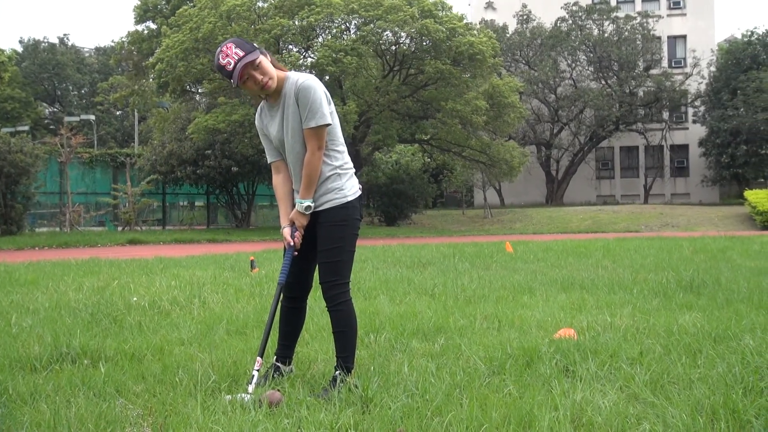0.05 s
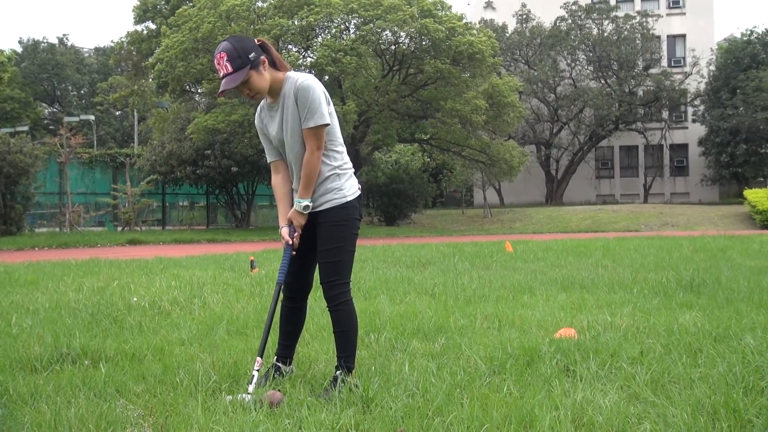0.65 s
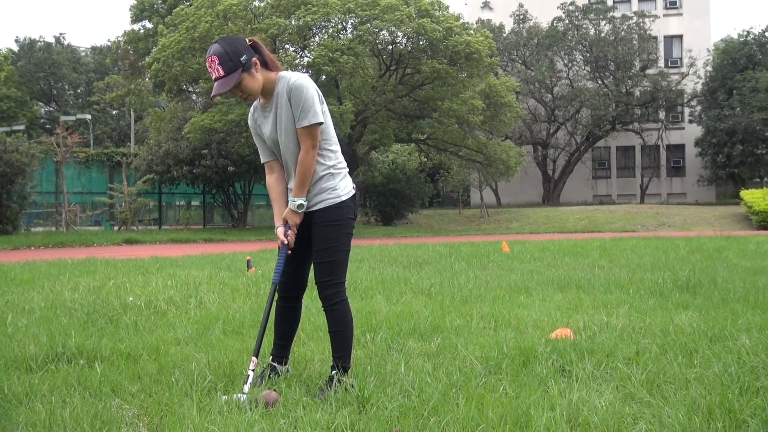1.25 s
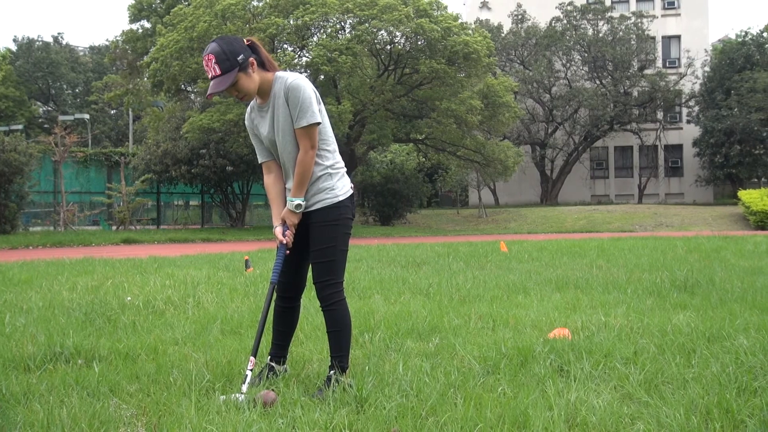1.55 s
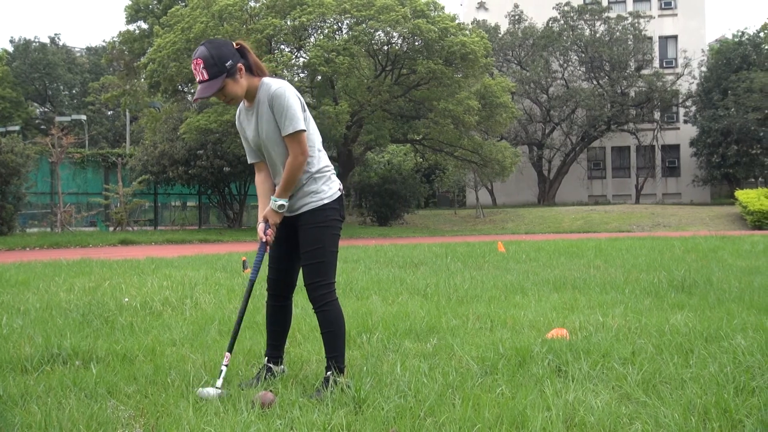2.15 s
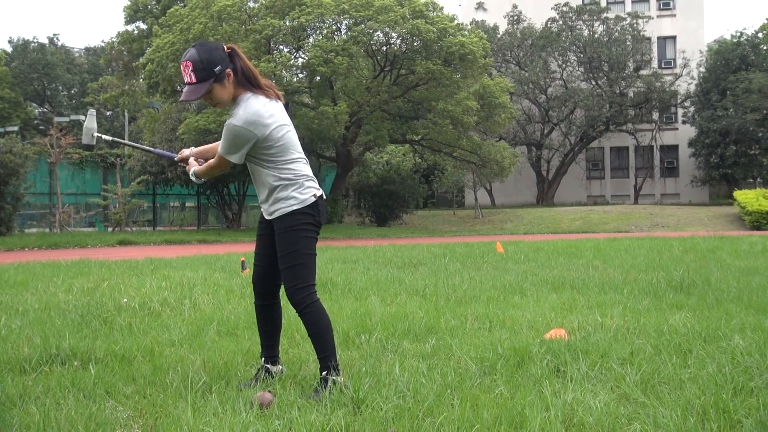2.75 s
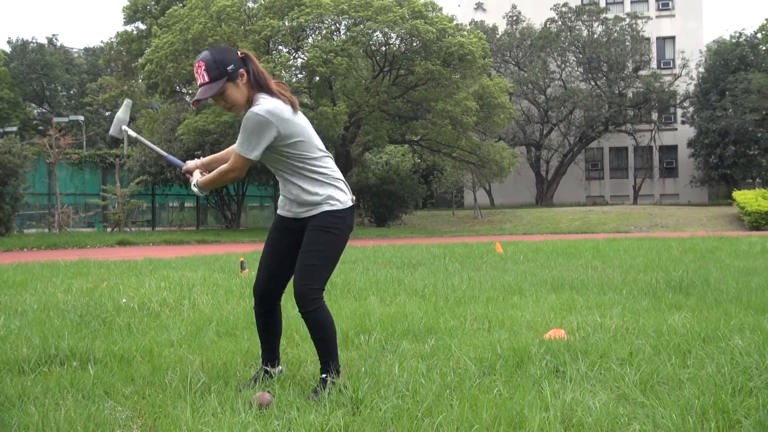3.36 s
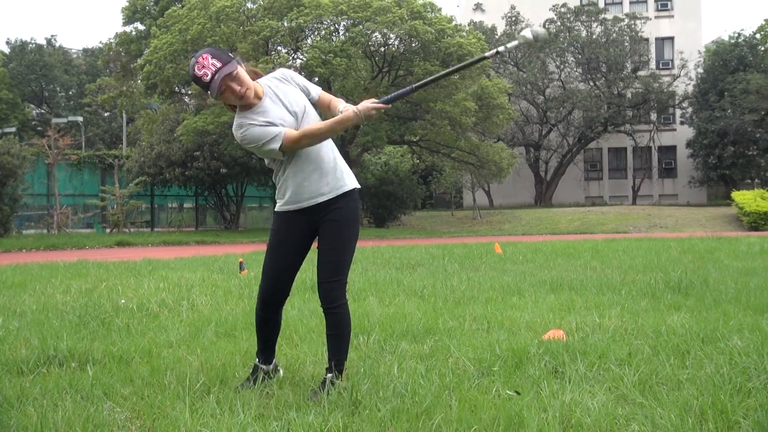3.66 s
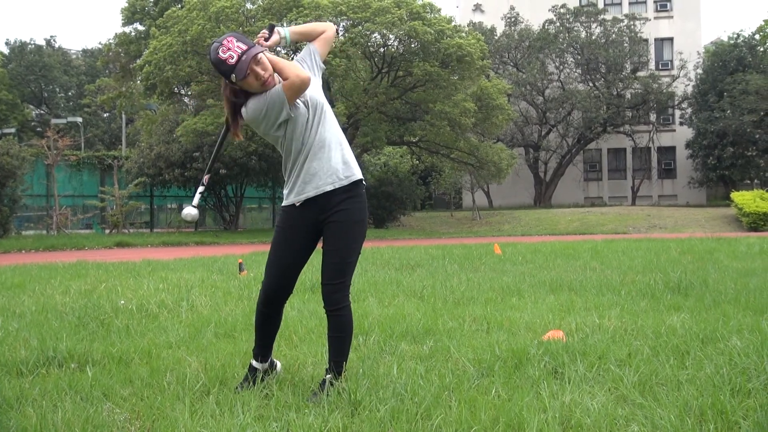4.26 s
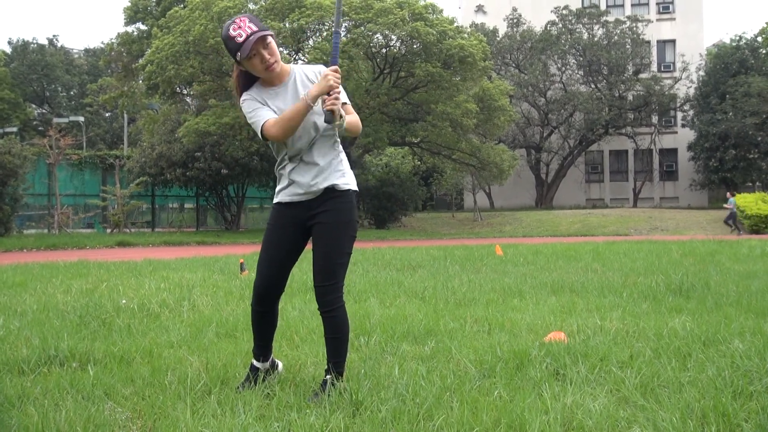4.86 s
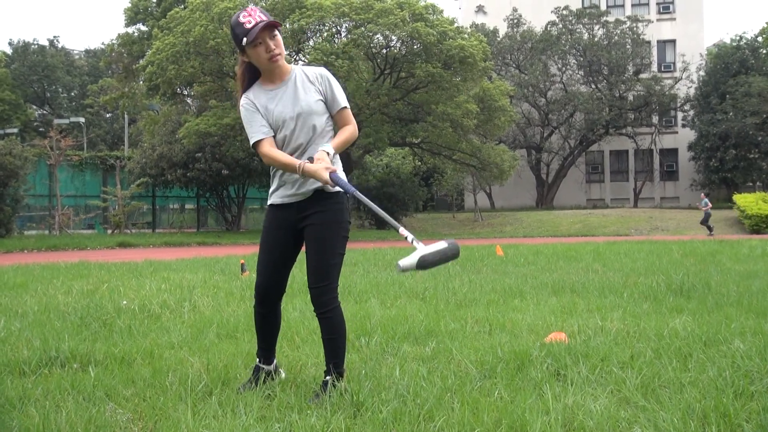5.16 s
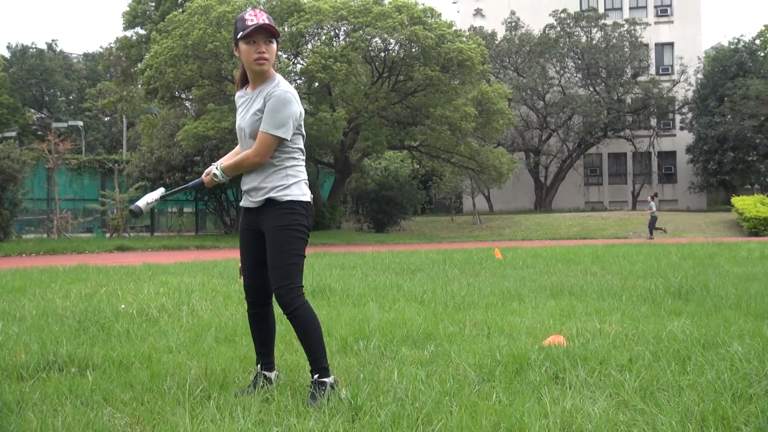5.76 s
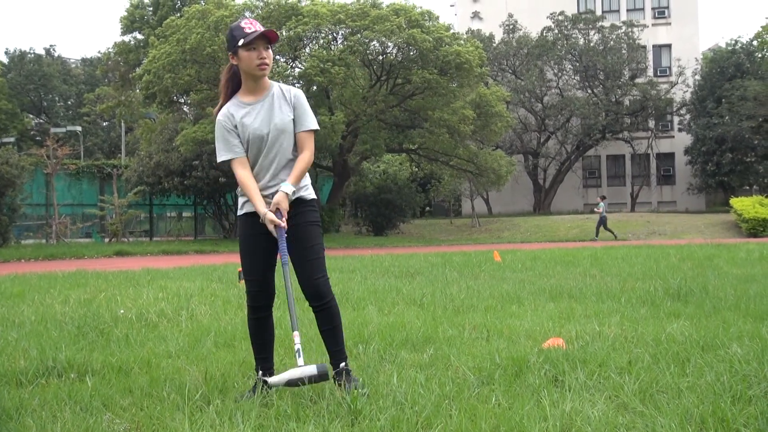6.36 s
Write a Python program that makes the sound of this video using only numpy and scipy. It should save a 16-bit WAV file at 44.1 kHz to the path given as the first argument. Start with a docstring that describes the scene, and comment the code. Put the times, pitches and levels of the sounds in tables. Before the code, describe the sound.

One sharp wooden crack of mallet on ball with a brief grass swish, against a quiet outdoor rumble and faint bird chirps.

```python
"""A mallet cracks against a wooden ball: the sudden push sends out a pulse and the wood rings briefly.
The ground thumps, and the swing tears through the lawn; ball and mallet also brush the grass lightly.
A small bird gives a high, buzzy trill of quick falling notes; far birds chirp and crickets sing faintly.
Underneath, a light breeze rumbles and distant traffic hums."""
import sys
import numpy as np
from scipy.fft import rfft, irfft, next_fast_len
from scipy.io import wavfile
from scipy.ndimage import map_coordinates

SR = 44100
rng = np.random.default_rng(int(sys.argv[2]) if len(sys.argv) > 2 else 0)


def dump(signal):
    """Clip the signal to [-1, 1] and save it as 16-bit WAV at the path in sys.argv[1]."""
    limited = np.clip(np.atleast_2d(signal).T, -1, 1)
    pcm = np.round(limited * 32767).astype(np.int16)
    wavfile.write(sys.argv[1], SR, pcm)


N = 282681

HIT_S = 3.5271  # when the mallet meets the ball
# the bright tone of cracking wood and stalks: (frequency [Hz], relative level [dB])
CRACK_TONE = [(800, -27), (2500, -0.5), (5000, -1.5), (7000, -6), (9500, 1), (15000, -4.5), (16000, -5)]


def strike(push_db=-10, push_hz=660, tick_db=-19, tick_s=.00037, scatter_db=-30, scatter_t60=.015):
    """The sudden push on the ball sends out one swing of air pressure; the wood cracks and rings."""
    # the tone of the noise that widens the crack: (frequency [Hz], relative level [dB])
    width_tone = [(120, -25), (350, 8), (1100, 2), (1500, -6), (2400, -6), (4100, 4), (4800, -28)]
    t = clock() - HIT_S
    cycles = (t - .00119) * push_hz  # counted from the middle of the contact
    push = -np.cos(2 * np.pi * cycles) * np.exp(-(cycles / .6) ** 2)
    # the first touch is a hard tick
    touch = (t >= 0) * np.exp(-(t / tick_s) ** 2)
    tick = noise(CRACK_TONE) * touch
    tick *= np.linalg.norm(touch) / np.linalg.norm(tick)
    # a brief noise, opposite in the two ears, widens the crack
    width = amp(-2) * noise(width_tone) * np.array([[1], [-1]])
    scatter = (noise(CRACK_TONE) + width) * dying(HIT_S, scatter_t60)
    return amp(push_db) * push + wood_ring() + amp(tick_db) * tick + amp(scatter_db) * scatter


def wood_ring(build_s=.002):
    """Mallet and ball ring with many short tones, which build up while the two still touch."""
    # the tones of the wood: (frequency [Hz], level [dB], time to fade by 60 dB [s])
    wood_tones = [(400, -12.0, 0.012), (810, -37.8, 0.044), (1020, -34.3, 0.05), (1240, -14.0, 0.01),
                  (1770, -19.3, 0.007), (2040, -17.0, 0.009), (2400, -34.2, 0.02), (2860, -19.1, 0.013),
                  (3640, -27.5, 0.012), (4230, -21.3, 0.01), (4680, -25.3, 0.018), (5010, -32.3, 0.019),
                  (5220, -30.1, 0.018), (5750, -23.6, 0.012), (7100, -28.9, 0.011), (8330, -24.6, 0.007),
                  (11500, -28.5, 0.007), (14790, -20.1, 0.007)]
    age = np.clip(clock() - HIT_S, 0, .5)
    ring = sum((-1) ** k * amp(db - 60 * age / t60) * np.sin(2 * np.pi * hz * age)
               for k, (hz, db, t60) in enumerate(wood_tones))
    return ring * (1 - np.exp(-age / build_s))


def thump(pitch_hz=113, level_db=-31, t60=.045):
    """The ground takes the blow with one short, low thump."""
    return amp(level_db) * dying(HIT_S, t60) * np.sin(2 * np.pi * pitch_hz * (clock() - HIT_S))


def swing(enter_s=3.496, in_grass_s=.097, rub_db=-55, tuft_db=-41.5, rise_s=.016, fall_s=.0099):
    """The mallet rubs harder the deeper it dips into the grass, and hardest in the tuft at the ball."""
    # the tone of the swish: (frequency [Hz], relative level [dB])
    swish_tone = [(150, -1), (400, 15), (1000, -4.5), (2000, -5.5), (5000, -2), (9000, -3.5), (14500, -1),
                  (16000, -10)]
    t = clock() - HIT_S
    rub = np.sqrt(np.abs(arch(enter_s, in_grass_s)))
    tuft = np.exp(-(t / np.where(t < 0, rise_s, fall_s)) ** 2)
    loudness = amp(rub_db) * rub + amp(tuft_db) * tuft
    return loudness * rustle(swish_tone, flicks_per_s=3000, flick_share=.5)


def stalk_snaps(t60=.009):
    """Grass stalks snap as the swing tears through them."""
    # the snaps: (time [s], level [dB])
    snaps = [(3.5543, -40.5), (3.564, -42), (3.570, -45), (3.586, -52)]
    return sum(amp(db) * dying(s, t60) for s, db in snaps) * noise(CRACK_TONE)


def grass_brushes():
    """Ball and mallet brush the grass lightly; each rustle swells and dies away."""
    # the touches: (peak time [s], level [dB], rise time [s], fall time [s])
    brushes = [(2.35, -83, .1, 0.1), (3.6, -76, .02, 0.086), (3.945, -69.5, .024, 0.045),
               (4.09, -84.5, 0.055, 0.14), (5.37, -78.5, 0.039, .04), (5.43, -82, .02, 0.045),
               (6.25, -75.5, 0.026, .04), (6.32, -81.5, 0.016, 0.089)]
    # the tone of the brushed blades: (frequency [Hz], relative level [dB])
    blade_tone = [(1000, -22.5), (3500, -4), (5000, 0.5), (8000, 1), (12500, -1.5), (13500, -10),
                  (14300, -31)]
    t = clock()
    loudness = sum(amp(db) * np.exp(-np.where(t < s, ((t - s) / rise) ** 2, np.abs(t - s) / fall))
                   for s, db, rise, fall in brushes)
    return loudness * rustle(blade_tone, flicks_per_s=690, flick_share=.39)


def rustle(tone, flicks_per_s, flick_share):
    """Many grass blades flick at random, over the smooth hiss of their rubbing."""
    flicks = unit((rng.random(N) < flicks_per_s / SR) * rng.standard_normal(N))
    rubbing = rng.standard_normal(N)
    return colour(np.sqrt(flick_share) * flicks + np.sqrt(1 - flick_share) * rubbing, tone)


def high_trill(centre_hz=7350, notes_per_s=145, drop_hz=2000):
    """A small bird sings high, buzzy trills of quick falling notes; each trill swells and stops short."""
    # the trills: (end time [s], length [s], level [dB])
    trills = [(.225, .14, -82), (2.125, .12, -83), (2.42, .13, -83), (2.713, .14, -81), (3.04, .13, -82)]
    t = clock()
    swell = sum(amp(db) * (t < end) * np.sqrt(np.clip((t - end) / length + 1, 0, 1))
                for end, length, db in trills)
    progress = (notes_per_s * t + .1 * wobble(12)) % 1  # runs from 0 to 1 in each note
    pitch = centre_hz + drop_hz * (.5 - progress) + 120 * wobble(600)
    return swell * unit(np.sin(np.pi * progress) ** 2 * np.sin(2 * np.pi * np.cumsum(pitch) / SR))


def crickets(centre_hz=3130, start_db=-85, fade_db_per_s=2.5, swell_db=3):
    """A faint, far chorus comes and goes as it fades."""
    level_db = start_db - fade_db_per_s * clock() + swell_db * wobble(8)
    return amp(level_db) * narrow(centre_hz, width_hz=170)


def birds(waver_hz=100):
    """Birds give short gliding whistles, blurred by the trees."""
    # the chirps: (start time [s], length [s], first pitch [Hz], last pitch [Hz], level [dB])
    chirps = [(.56, .04, 4570, 4000, -77), (1.41, 0.086, 4450, 4000, -73), (1.443, .03, 4150, 3100, -74),
              (3.25, .04, 3830, 3670, -74), (4.333, .04, 3064, 3130, -71.5),
              (4.697, 0.037, 4020, 4450, -73), (4.857, 0.053, 2650, 2080, -69),
              (5.64, .03, 5100, 4950, -81)]
    out = np.zeros(N)
    waver = waver_hz * wobble(250)
    for start, length, first_hz, last_hz, db in chirps:
        progress = np.clip((clock() - start) / length, 0, 1)
        pitch = first_hz + (last_hz - first_hz) * progress + waver
        out += amp(db) * arch(start, length) * np.sin(2 * np.pi * np.cumsum(pitch) / SR)
    return out


def breeze(steady_db=-60, lull_from_s=4.5, lull_db_per_s=4, flutter_db=.5):
    """The wind's low rumble swells with each gust and dies down near the end."""
    # the gusts: (peak time [s], half length [s], boost [dB])
    gusts = [(.3, .2, 2.5), (.91, .28, 7), (3.22, .12, 2.5), (4.05, .3, 2.5), (4.89, .09, 3.5)]
    # the tone of the wind: (frequency [Hz], relative level [dB])
    rumble_tone = [(15, -46), (25, -28), (45, -6), (65, 2), (100, -1), (140, -13), (220, -26), (400, -44),
                   (900, -120)]
    t = clock()
    gust_db = sum(db * np.exp(-((t - s) / half) ** 2) for s, half, db in gusts)
    lull_db = lull_db_per_s * np.maximum(t - lull_from_s, 0)
    return amp(steady_db + gust_db - lull_db + flutter_db * wobble(7)) * noise(rumble_tone)


def traffic(wash_db=-59, hum_hz=179.8, hum_db=-70.5, drone_hz=477, drone_db=-69.5):
    """Far roads make a steady wash of noise over a low engine hum; a drone joins them."""
    # the tone of the roads: (frequency [Hz], relative level [dB])
    road_tone = [(50, -24), (120, 4.5), (190, 4), (320, -1), (490, -1.5), (680, -7), (950, -6.5),
                 (1500, -13), (3100, -21), (4700, -26.5), (6200, -33.5), (9000, -38.5), (13500, -40.5),
                 (13900, -55)]
    fade_in = np.clip((clock() - 1.82) / .39, 0, 1)  # starts at 1.82 s and takes 0.39 s
    drone = amp(drone_db) * fade_in * narrow(drone_hz, width_hz=89)
    wash = amp(wash_db) * noise(road_tone)
    hum = amp(hum_db) * narrow(hum_hz, width_hz=9)
    return wash + hum + drone


def engine(sag_hz_per_s=52, waver_hz=1.49, flutter_db=1, octave_db=-11):
    """One far engine swells and fades; its pitch sags as it slows through each surge."""
    # the surges: (start time [s], length [s], first pitch [Hz], level [dB])
    surges = [(0, .3, 266, -68), (.7, .45, 242, -70), (2.35, .8, 261, -63.3), (3.55, .3, 244, -67),
              (3.93, .32, 257, -67), (4.57, .33, 247, -65)]
    t, out = clock(), np.zeros(N)
    waver = waver_hz * wobble(20)
    for start, length, hz, db in surges:
        pitch = hz - sag_hz_per_s * (t - start) + waver
        phase = 2 * np.pi * np.cumsum(pitch) / SR
        out += amp(db) * arch(start, length) * unit(np.sin(phase) + amp(octave_db) * np.sin(2 * phase))
    return out * amp(flutter_db * wobble(9))


def town_spread(level_db=-79):
    """Low town noise, opposite in the two ears, makes the background a little wider."""
    # the tone of what the ears do not share: (frequency [Hz], relative level [dB])
    spread_tone = [(25, -6.5), (65, 11.5), (160, 0.5), (450, 4), (600, -14.5), (850, -58), (2000, -31.5)]
    spread = amp(level_db) * noise(spread_tone)
    return np.array([spread, -spread])


def amp(db):
    """Turn decibels into a number to multiply by."""
    return 10 ** (np.asarray(db) / 20)


def unit(x):
    """Scale a sound to an average strength (rms) of 1."""
    return x / np.sqrt(np.mean(x ** 2) + 1e-20)


def clock():
    """The time of each sample, in seconds."""
    return np.arange(N) / SR


def wobble(rate):
    """A smooth curve through `rate` random values a second."""
    return map_coordinates(rng.standard_normal(int(N * rate / SR) + 4), [clock() * rate])


def dying(start, t60):
    """A curve that jumps to 1, then fades by 60 dB every t60 seconds."""
    t = clock() - start
    return (t >= 0) * np.exp(-np.log(1000) * np.abs(t) / t60)


def arch(start, length):
    """A rounded curve that rises from 0 to 1 and returns to 0."""
    return np.sin(np.pi * np.clip((clock() - start) / length, 0, 1))


def filtered(x, response):
    """Turn each frequency of a sound up or down by response(hz)."""
    size = next_fast_len(N + SR // 2)
    return irfft(rfft(x, size) * response(np.fft.rfftfreq(size, 1 / SR)), size)[..., :N]


def colour(x, tone):
    """Shape a sound with a tone table, at strength 1."""
    freqs, db = np.transpose(tone)
    return unit(filtered(x, lambda hz: amp(np.interp(np.log(hz + 1), np.log(freqs), db))))


def noise(tone):
    """Noise with the given tone, at strength 1."""
    return colour(rng.standard_normal(N), tone)


def narrow(centre_hz, width_hz):
    """Noise gathered around one pitch, at strength 1."""
    return unit(filtered(rng.standard_normal(N), lambda hz: np.exp(-((hz - centre_hz) / width_hz) ** 2)))


def scene():
    """The sources sit near the centre, a little louder on the left."""
    mallet = strike() + thump() + swing() + stalk_snaps() + grass_brushes()
    background = high_trill() + crickets() + birds() + breeze() + traffic() + engine()
    return (mallet + background) * amp([[.2], [-.2]]) + town_spread()


def record(dry, whine_hz=13470, whine_db=-95.5, top_hz=15850):
    """Add a faint high whine and cut off the very highest treble."""
    whine = amp(whine_db) * narrow(whine_hz, width_hz=146)
    return filtered(dry + whine, lambda hz: np.clip((top_hz - hz) / 400 + .5, 0, 1))


dry = scene()
out = record(dry)
dump(out)
```